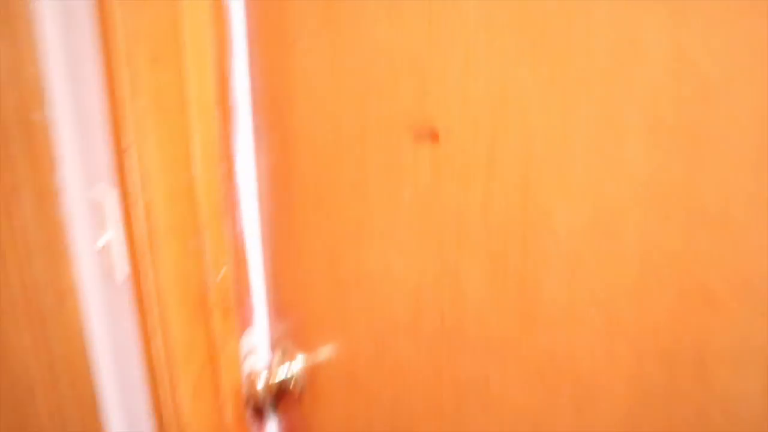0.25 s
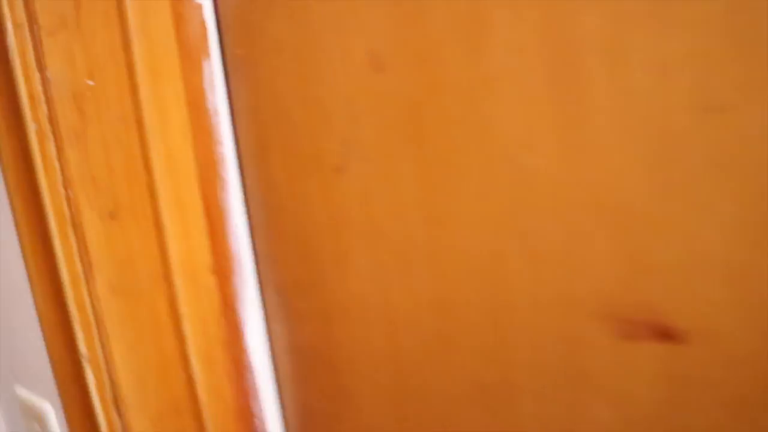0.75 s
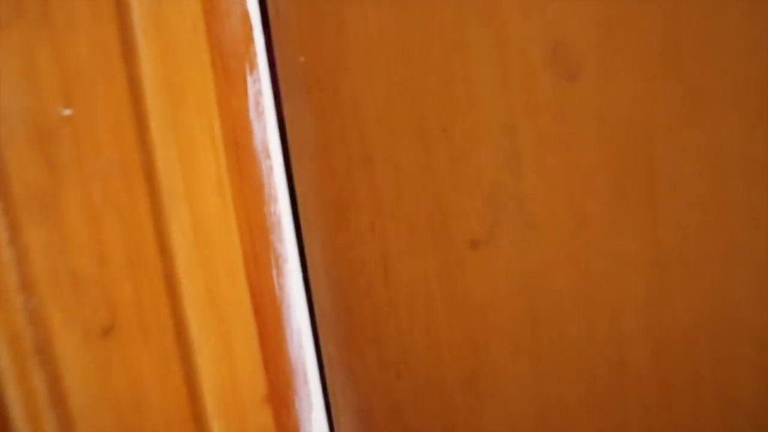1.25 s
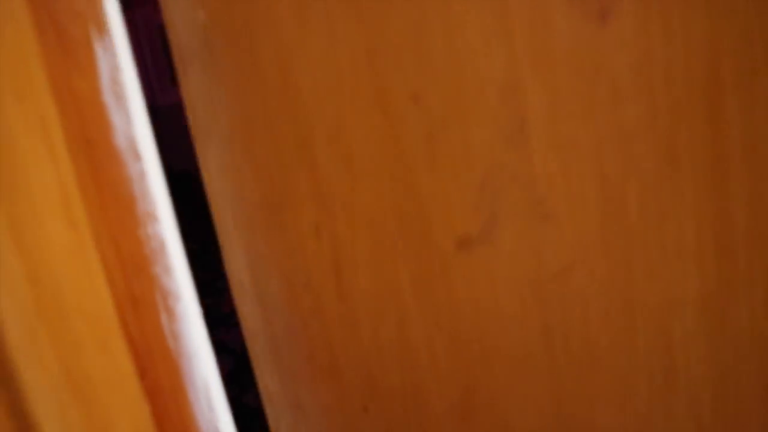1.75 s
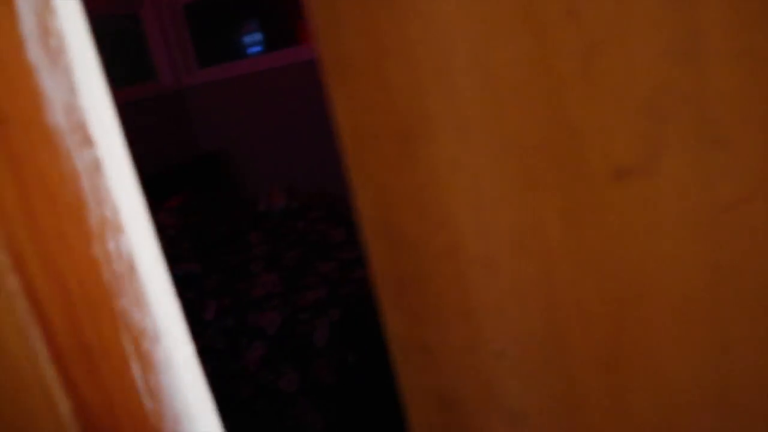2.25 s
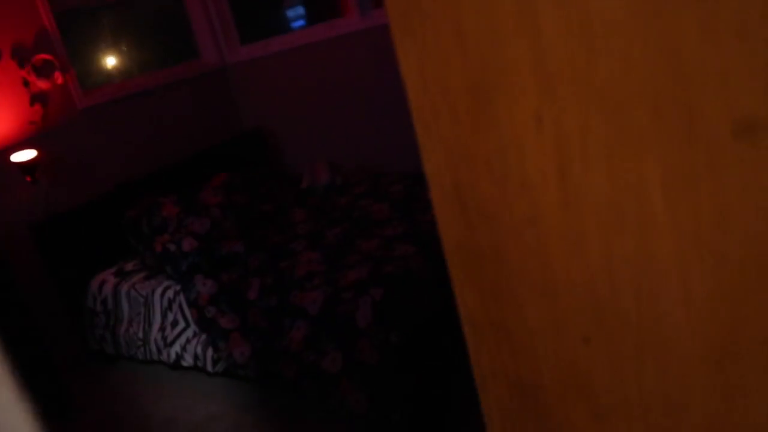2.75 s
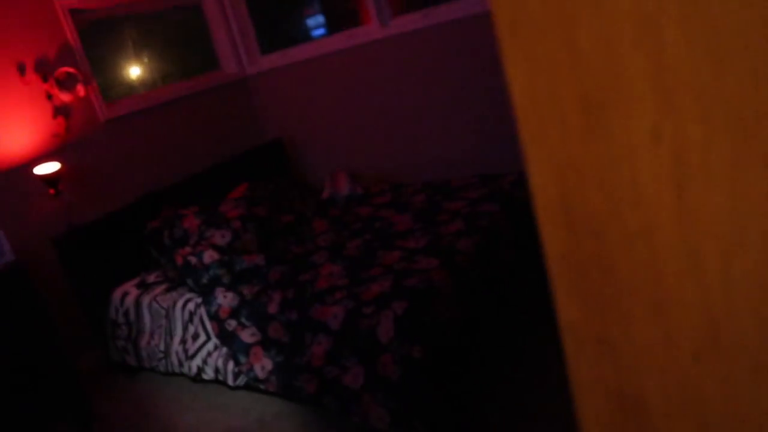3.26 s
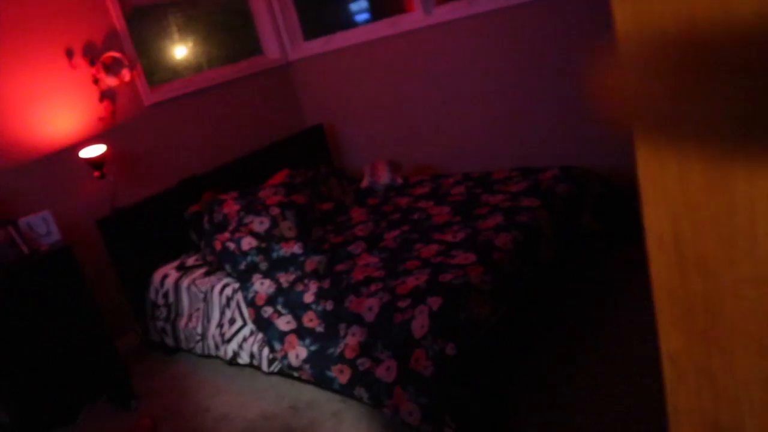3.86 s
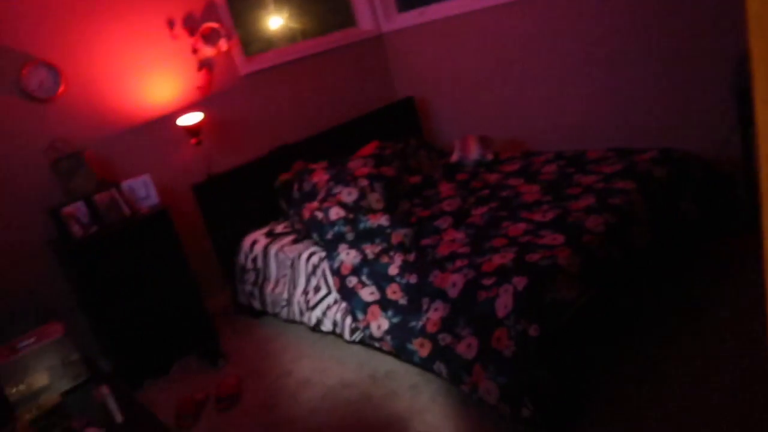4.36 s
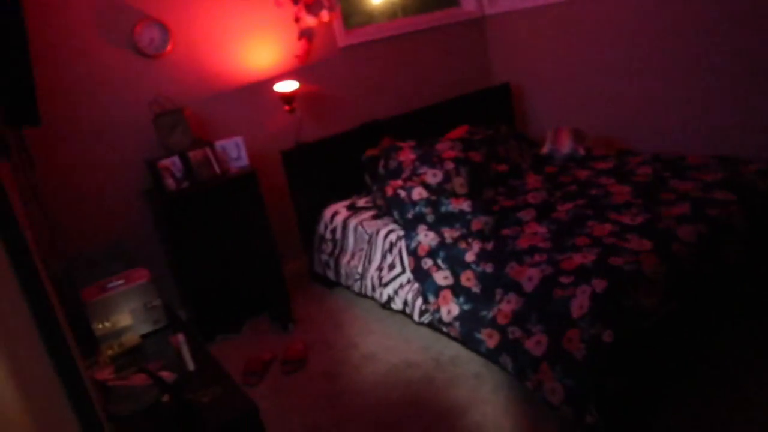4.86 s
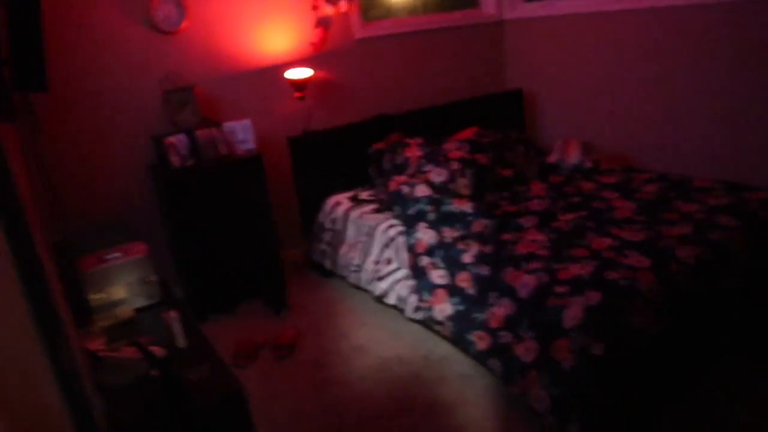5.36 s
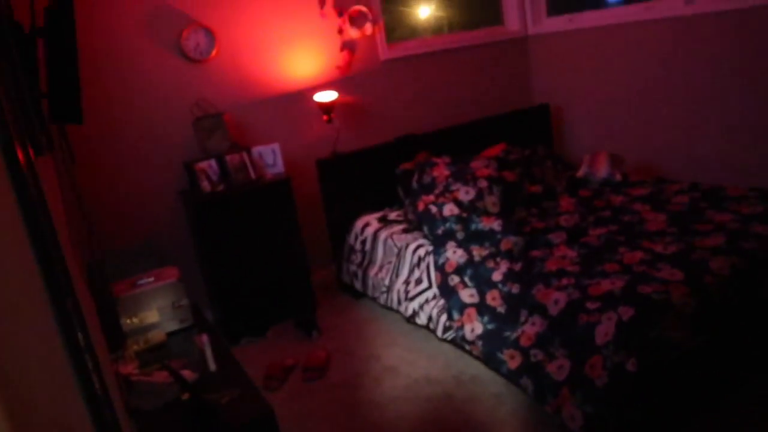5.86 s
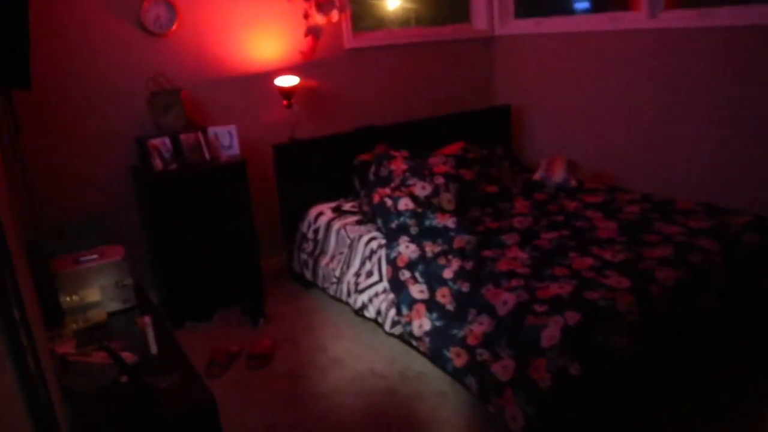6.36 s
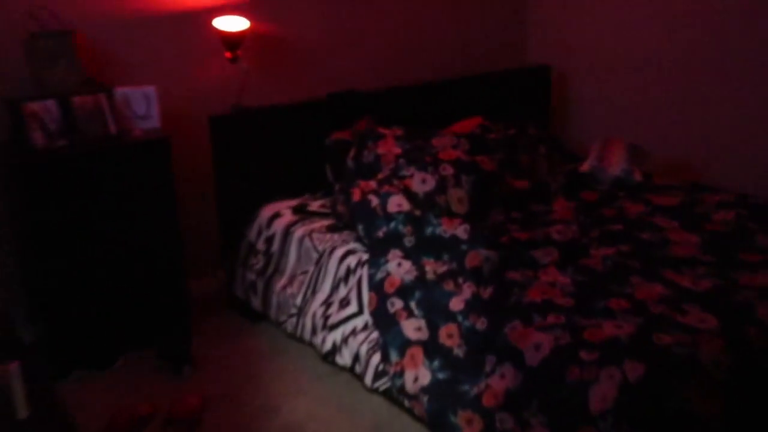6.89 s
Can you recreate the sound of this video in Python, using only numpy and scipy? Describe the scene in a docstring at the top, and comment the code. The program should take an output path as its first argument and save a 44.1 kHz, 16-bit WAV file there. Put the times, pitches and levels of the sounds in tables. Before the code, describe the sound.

A door latch pops open loudly in a quiet humming room, followed by close plastic creaks, clicks and handling rustle.

```python
"""Bedroom door, hand-held camera

A wooden door pops free of its latch, rings into the corridor and swings open on a quiet bedroom
with a low hum. Right at the left microphone, the camera's plastic case creaks, ticks and is rubbed
by fingers. The camera widens its stereo picture, so treble arrives largely in opposite phase."""
import sys
import numpy as np
from scipy import signal
from scipy.fft import rfft, irfft
from scipy.io import wavfile
from scipy.ndimage import uniform_filter1d

SR = 44100
rng = np.random.default_rng(int(sys.argv[2]) if len(sys.argv) > 2 else 0)


def unload_audio(sound):
    """Save the sound as a 16-bit wav file, at the path given as the first command line argument."""
    columns = np.transpose(np.atleast_2d(sound))
    # keep every value between -1 and 1, then stretch to whole-number steps
    steps = np.round(np.clip(columns, -1, 1) * 32767)
    wavfile.write(sys.argv[1], SR, steps.astype(np.int16))


N = 314344


def amp(db):
    return 10 ** (np.asarray(db) / 20)


def unit_rms(x):
    return x / np.sqrt(np.mean(x ** 2) + 1e-20)


def curve_at(points, hz):
    """Read a curve along a logarithmic frequency axis."""
    f, value = np.transpose(points)
    return np.interp(np.log(hz + 1), np.log(f + 1), value)


def add(mix, start_s, sound):
    part = mix[:, round(start_s * SR):][:, :sound.shape[-1]]
    part += sound[..., :part.shape[1]]


def ring(hz, t60, rise_s, count):
    """A sine that swells in and dies by 60 dB in t60 seconds."""
    t = np.arange(count) / SR
    return np.sin(2 * np.pi * hz * t) * amp(-60 * t / t60) * (1 - np.exp(-t / rise_s))


def drift(rate_hz):
    """A slow random wander, rms about 1."""
    steps = rng.standard_normal(N // 256 + 2)
    smooth = signal.filtfilt(*signal.butter(2, rate_hz, fs=SR / 256), steps)
    return np.interp(np.arange(N) / 256, np.arange(len(steps)), np.clip(unit_rms(smooth), -2, 2))


def noise_spectra(size):
    """Two sets of random short-time spectra, with their frequencies and times."""
    frames = 4 * N // size + 5
    z = rng.standard_normal((frames, size // 2 + 1, 4)).T
    return z[:2] + 1j * z[2:], np.fft.rfftfreq(size, 1 / SR)[:, None], np.arange(frames) * size / 4 / SR


def to_sound(spectra):
    size = 2 * (spectra.shape[-2] - 1)
    return signal.istft(spectra, nperseg=size, noverlap=3 * size // 4)[1][..., :N]


def left_right(centre, side):
    return np.array([centre + side, centre - side])


def room_tone():
    """Rumble and wavering hum in the centre, hiss mostly at the sides."""
    # Air at centre and sides. Each row: frequency in Hz, relative level in dB.
    centre_air = [(15, -25), (25, -37), (54, -2), (173, -7.5), (192, -3), (293, -6), (326, -9), (353, -4),
                  (599, -15), (666, -19), (722, -19), (1730, -29), (2140, -29.5), (11000, -49),
                  (14000, -92)]
    side_air = [(21, -55), (35, -28), (167, -3), (245, -0.5), (301, -1.5), (399, 0.5), (557, -2), (840, -4),
                (1030, -3), (1370, -7), (2280, -8.5), (5740, -17), (14100, -31), (16000, -34)]
    # The low end is stronger in the corridor than in the bedroom. Each row: time in seconds, gain in dB.
    rumble = [(0, -2), (1.4, -1), (2.2, 0), (3, -2.5), (7.13, -4)]
    # Hum lines. Each row: frequency in Hz, base level in dB, waver in dB.
    hum = [(49.7, -51, 6.5), (58.3, -50, 0.5), (204.4, -52, 1), (235.7, -54, -5.5), (302.2, -52, 3.5),
           (353, -56.5, 2.5), (404, -63.5, -7.5)]
    noise, hz, frame_s = noise_spectra(size=4096)
    rumble_db = np.interp(frame_s, *np.transpose(rumble)) / (1 + (hz / 350) ** 2)
    centre = unit_rms(to_sound(noise[0] * amp(curve_at(centre_air, hz) + rumble_db)))
    centre *= amp(-44 + .5 * drift(0.38))
    side = amp(-52.5) * unit_rms(to_sound(noise[1] * amp(curve_at(side_air, hz))))
    t = np.arange(N) / SR
    for f, db, waver_db in hum:
        level_db = db + waver_db * drift(2.26) + np.interp(t, *np.transpose(rumble))
        phase = 2 * np.pi * (f * t + rng.random()) + 0.27 * drift(11.0)
        centre += np.sqrt(2) * amp(level_db) * np.sin(phase)
    return left_right(centre, side)


def finger_rub():
    """Patchy friction hiss of skin on the case, brighter when quick, leaning to the left."""
    # Steady rustle of the holding hand. Each row: time in seconds, relative level in dB.
    grip = [(0, -76), (.25, -74.5), (.52, -71), (.78, -77), (1.1, -73.5), (1.35, -82.5), (1.55, -74),
            (2, -86), (2.3, -78.5), (2.5, -88), (3.4, -88.5), (3.9, -82.5), (4.15, -74), (5.56, -74.5),
            (5.64, -94), (6.25, -90), (6.4, -74), (6.5, -78), (7.13, -88)]
    # Sliding fingers. Each row: middle and length in seconds, pressure in dB, speed 0-1, squeal in Hz.
    strokes = [(0.719, 0.05, -70.5, 0.13, 1470), (4.406, 0.034, -59.5, 0.7, 4530),
               (4.55, 0.31, -68, 0.59, 2200), (4.716, 0.056, -72, 0.73, 2130),
               (4.884, 0.069, -72.5, 0.5, 2580), (5.024, 0.16, -59.5, 0.9, 2280),
               (5.524, 0.14, -74, 0.27, 1490), (5.373, 0.12, -68.5, 0.4, 2130),
               (6.099, 0.097, -68, 0.4, 1430), (6.212, 0.076, -73, 0.45, 1140)]
    # Friction colours, blended by speed. Each row: frequency in Hz, relative level in dB.
    slow_rub = [(500, 4.5), (1000, 7.5), (1700, 2.5), (2200, -0.5), (3800, 2), (6100, -1), (7200, -2),
                (9800, -4.5), (12300, 2), (14500, -24), (15800, -58)]
    fast_rub = [(500, -33.5), (1000, -55.5), (1800, -14), (2500, -5), (4200, -7.5), (5800, 5), (7000, -0.5),
                (9800, 10), (12500, -48), (13800, -18), (15500, -67)]
    # Width of the rub. Each row: frequency in Hz, centre minus side in dB.
    centre_over_side = [(500, 9), (2000, 1), (5000, -4), (9000, -4), (11500, -10), (14000, -60)]
    grip_speed, grip_squeal_hz, left_lean = 0.19, 2270, 0.24
    noise, hz, t = noise_spectra(size=256)
    middle, length, pressure_db, peak_speed, stroke_hz = np.transpose(strokes)[..., None]
    off_middle = (2 * (t - middle) / length) ** 2  # pressure and speed ease off toward both ends
    stroke_db = pressure_db - 9 * off_middle ** 0.87
    power = amp(2 * np.vstack([np.interp(t, *np.transpose(grip)), stroke_db]))
    speeds = np.vstack([np.full_like(t, grip_speed), peak_speed / (1 + 0.43 * off_middle)])
    speed = np.clip((power * speeds).sum(0) / power.sum(0), 0, 1)
    squeal_hz = np.append(grip_squeal_hz, stroke_hz)[power.argmax(0)]  # the loudest touch sets the pitch
    squeal_db = 11 * np.exp(-(np.log((hz + 1) / squeal_hz) / .09) ** 2)
    colour = amp((2.5 - speed) * curve_at(slow_rub, hz) + speed * curve_at(fast_rub, hz) + squeal_db)
    colour /= np.sqrt((colour ** 2).mean(0))
    patches = uniform_filter1d(rng.standard_normal(colour.T.shape), 12, axis=0)
    patches = unit_rms(uniform_filter1d(patches, 6, axis=1)).T
    flicker = unit_rms(uniform_filter1d(rng.standard_normal(len(t)), 3))
    colour *= np.sqrt(power.sum(0)) * amp(2.6 * patches + 1.8 * flicker)
    centre = left_lean * noise[0] + np.sqrt(1 - left_lean ** 2) * noise[1]
    centre *= amp(curve_at(centre_over_side, hz))
    return left_right(*to_sound(np.array([centre, noise[0]]) * colour))


def skin_scuffs():
    """Skin scuffs over the case: dense tiny grains under a soft swell, louder on the left."""
    # Each row: middle and length in seconds, left level in dB, band centre in Hz.
    scuffs = [(0.409, 0.013, -41, 1460), (0.432, .015, -54, 2600), (0.463, .014, -48, 2600),
              (0.52, 0.0065, -38.5, 2320), (0.546, .008, -48, 2000), (0.6, .012, -52, 2500),
              (0.715, 0.029, -45, 1500), (0.827, .012, -45.5, 2780), (1.501, 0.078, -63, 900),
              (2.8, 0.022, -55, 1500), (5.386, 0.087, -51, 1210), (5.384, 0.071, -46.5, 2800),
              (6.084, 0.025, -51, 1990), (6.222, 0.044, -43.5, 1300), (5.47, 0.01, -53, 2200),
              (4.72, .02, -49, 3500)]
    octaves, grains_per_s, spread_db = 1.34, 2500, 4.5
    out, t = np.zeros((2, N)), np.arange(-4096, 4096) / SR
    for middle, length, db, hz in scuffs:
        noise = rng.standard_normal((4, len(t)))
        catches = rng.random((2, len(t))) < grains_per_s / SR
        grains = noise[:2] * catches * amp(spread_db * noise[2:])
        band = signal.butter(2, hz * 2 ** (octaves * np.array([-.5, .5])), "bandpass", fs=SR)
        left, other = unit_rms(signal.lfilter(*band, grains))
        swell = np.exp(-(2 * t / length) ** 4)
        add(out, middle + t[0], amp(db) * swell * np.array([left, 0.19 * left + 0.46 * other]))
    return out


def dull_bumps():
    """Low pushes through hand and door, alike at both microphones."""
    # Each row: start in seconds, level in dB, pitch in Hz.
    bumps = [(1.467, -17.5, 168), (1.485, -25, 131), (1.496, -28, 150), (1.519, -21, 139),
             (1.535, -22, 175), (2.338, -20, 65.4), (5.47, -24, 165), (5.492, -22, 200), (5.5121, -23, 170),
             (5.532, -18, 171), (5.554, -19, 206), (6.07, -14, 123), (6.0801, -12, 133), (6.087, -17, 163)]
    out = np.zeros((2, N))
    for start, db, hz in bumps:
        add(out, start, amp(db) * ring(hz, t60=3.3 / hz, rise_s=0.0013, count=8000))
    return out


def case_ring(body_db, treble_db):
    """The plastic case rings: treble at once, the body swelling a moment later, with a little grit."""
    # Each row: frequency in Hz, relative level in dB, t60 in seconds, signed share at the right.
    modes = [(238, 5.5, 0.0088, 0.72), (652, -6, 0.025, 0.74), (789, 3, 0.018, 0.64), (1001, 3.5, 0.017, 1),
             (1180, -2.5, 0.0066, 1), (1750, -13, 0.018, 0.79), (2200, -39, 0.0097, 0.42),
             (2710, -10.5, 0.017, -0.45), (3920, -1.5, 0.0093, 0.99), (4420, 1, 0.0065, -0.51),
             (5690, -7.5, 0.011, -0.69), (6550, 7, 0.0052, 0.11), (7550, 15, 0.00045, 0.62)]
    tuning = 1 + .013 * rng.standard_normal(len(modes))
    t = np.arange(2000) / SR
    grit_band = signal.butter(2, [900, 2200], "bandpass", fs=SR)
    grit = signal.lfilter(*grit_band, rng.standard_normal((2, len(t))))
    out = amp(treble_db - 2.5 - 60 * t / 0.087) * grit
    out[:, :58] -= amp(body_db + 6) * np.hanning(58) ** 2  # the wall is pulled in, then springs back
    for tune, (hz, db, t60, right_share) in zip(tuning, modes):
        if hz > 2500:
            gain, rise_s, delay = -amp(db + treble_db - 2.5), .0002, 0
        else:
            gain, rise_s, delay = amp(db + body_db + 5.5), .0003, 52
        mode = gain * np.roll(ring(hz * tune, t60, rise_s, len(t)), delay)
        out += np.array([np.roll(mode, 4), right_share * mode])
    return signal.lfilter(*signal.iirnotch(3270, Q=11, fs=SR), out)  # the case is deaf at this pitch


def seam_creaks():
    """The seam sticks and slips; every slip pulls the case the same way, so the snaps sound alike."""
    # Each row: start in seconds, treble and body strength in dB.
    snaps = [(0.0174, -40, -35), (0.0735, -28, -34.5), (0.0847, -32, -35.5), (0.099, -30, -34.5),
             (0.1095, -29.5, -37.5), (0.147, -27, -32.5), (0.191, -27, -32), (2.319, -39.5, -34.5),
             (3.4973, -27.5, -31), (3.5055, -33, -35), (3.978, -21.5, -28.5), (3.99, -32, -32),
             (4.1415, -19.5, -29), (4.1498, -25, -29), (4.16, -35, -32), (4.1772, -21.5, -29.5),
             (4.1851, -22, -31), (4.1914, -26, -33.5), (4.198, -26, -33), (4.2068, -24, -33),
             (4.2176, -22, -34), (4.2273, -28, -32.5), (4.236, -26, -35)]
    out = np.zeros((2, N))
    for start, treble_db, body_db in snaps:
        add(out, start, case_ring(body_db, treble_db))
    return out


def fingertip_ticks():
    """A fingertip hits plastic: a click of a few cycles, a bright spit, a short scratch and a knock."""
    # Each row: peak time in seconds, click level in dB, pitch in Hz, width in cycles,
    # then scratch strength, knock strength and lean to the left, all in dB.
    ticks = [(3.53, -31, 3040, 2, -42, -62, 5), (3.571, -41, 2390, 2.4, -39, -58, 2.5),
             (3.63, -31.5, 3200, 2, -42, -60, 5), (3.728, -34.5, 2630, 1.7, -39, -67, 8),
             (4.371, -16, 2560, 0.75, -12, -35.5, 13), (4.3937, -12.5, 4570, 2.54, -24.5, -48, 3),
             (4.3936, -16.5, 2640, 2, -38, -43, 10), (4.509, -25, 2540, 2.3, -45, -47, 4),
             (4.723, -30.5, 2370, 4.1, -37, -67, 14), (4.8447, -16, 2870, 1.7, -35, -53, 18),
             (4.851, -23, 1390, 1.6, -30, -43, 2), (4.8542, -36, 1500, 1.3, -36, -37.5, -5),
             (4.8566, -38, 1500, 1.6, -38, -41, -5), (5.179, -36, 1200, 1.5, -36, -43, 0),
             (5.2035, -2.5, 1880, 0.71, -14, -46, 17), (5.2052, -28, 2000, 2.6, -33, -46, 8),
             (5.31, -33, 1025, 2.06, -30, -52, -1), (5.3167, -27.5, 1740, 3, -34, -43, 1),
             (5.338, -37, 1670, 1.4, -37, -60, 3), (5.362, -32, 1040, 2.6, -43, -55, 10),
             (5.464, -41, 1650, 2.7, -34.5, -48, 6), (5.4918, -29, 2160, 1.2, -32.5, -50, 3),
             (5.511, -33, 1710, 1.55, -30, -49, 2.5), (5.5328, -37, 1760, 1.7, -32, -51, -2),
             (5.554, -42, 1730, 1.5, -39.5, -51, -4), (5.565, -36, 1800, 0.76, -34, -57, -8.5),
             (6.288, -35, 1720, 5.7, -44, -55, 9.5), (6.2983, -27, 2040, 1.6, -34.5, -43.5, 8),
             (6.321, -30, 2270, 1.6, -38, -45, 9.5), (6.3548, -23, 2200, 0.73, -44, -54, 9),
             (6.416, -27, 2190, 2.4, -31.5, -46, 3), (6.468, -31, 2220, 1.5, -37.5, -45, 1),
             (6.63, -44, 2150, 1.9, -39, -65, 2), (6.991, -27, 2340, 1.5, -45, -44.5, 7),
             (7.032, -32.5, 2490, 2.3, -44, -52, 1.5), (7.1245, -34, 2300, 4, -48, -57, 9)]
    fall_over_rise, pitch_sag, swing_back = 2.1, .06, 0.11
    out, t = np.zeros((2, N)), np.arange(2000) / SR
    scratch_band = signal.butter(3, [700, 3600], "bandpass", fs=SR)
    spit_band = signal.butter(3, [5000, 11200], "bandpass", fs=SR)
    for peak_s, db, hz, cycles, scratch_db, knock_db, pan_db in ticks:
        noise = rng.standard_normal((3, len(t)))
        start, turns = peak_s - cycles / hz, hz * t - cycles
        swell = np.exp(-(2 * turns / cycles / np.where(turns > 0, fall_over_rise, 1)) ** 2)
        click = -amp(db) * swell * np.cos(2 * np.pi * turns * (1 - pitch_sag * turns / cycles))
        scratch_s = 0.0031 * cycles  # sharper ticks scratch more briefly
        spit = signal.lfilter(*spit_band, amp(scratch_db + 3.5 - 60 * t / (2.9 * scratch_s)) * noise[0])
        stroke = amp(scratch_db - 5.6 * (t / scratch_s) ** 2) * np.minimum(t / 0.00035, 1)
        scratch = stroke * signal.lfilter(*scratch_band, noise[1:])
        # Touches near the left port turn the right channel over; a share arrives there late, inverted.
        polarity = np.clip(2 - pan_db / 0.81, -.5, 1)
        late_click = swing_back * (1 - polarity) * np.roll(click, 12)
        right = amp(-pan_db) * (polarity * click + scratch[1]) - .6 * spit - late_click
        add(out, start, np.array([click + spit + scratch[0], right]))
        add(out, start, case_ring(knock_db, knock_db - 27))
    return out


def corridor_echo(sound):
    """Sparse reflections of random sign, each band dying at its own speed."""
    # Each row: frequency in Hz, t60 in seconds.
    decay = [(100, 0.7), (260, 0.16), (700, 0.3), (1840, 0.26), (4850, 0.23)]
    taps = np.zeros((2, SR // 2))
    arrivals = np.arange(300, SR // 2 - 20, 20) + rng.integers(0, 20, (2, (SR // 2 - 301) // 20))
    np.put_along_axis(taps, arrivals, rng.choice([-1., 1.], arrivals.shape), 1)
    hz, t, spectra = signal.stft(taps, SR, nperseg=256)
    tail = signal.istft(spectra * amp(-60 * t / curve_at(decay, hz)[:, None]), SR, nperseg=256)[1]
    centre, side = signal.fftconvolve(sound[None], tail / np.linalg.norm(tail[0]), axes=1)[:, :N]
    return left_right(centre, amp(-32) * side)


def door():
    """Each blow clacks and rings the wooden leaf; the spot struck sets the modes' strengths and signs."""
    # The latch lets go, then the swinging door knocks faintly.
    # Each row: start in seconds, strength in dB, spot on the leaf 0-1.
    blows = [(1.621, -7, 0.15), (1.624, -5, 0.29), (1.6275, -5.5, 0.2), (1.6309, -4.5, .41),
             (2.797, -32.5, 0.2), (2.808, -49, .35)]
    # Modes of the leaf. Each row: frequency in Hz, relative level in dB, t60 in seconds.
    modes = [(100.5, -12, 0.23), (172.5, -17, 0.31), (285, -12.5, 0.12), (380, -5.5, 0.053),
             (460, -12, 0.049), (520, -12, 0.068), (653, -13, 0.068), (822, -5, 0.037), (854, -15, .08),
             (882, -10, 0.17), (926, -14, 0.2), (942, -11, 0.18), (1024, -7, 0.093), (1102, -4, 0.046),
             (1204, -3, 0.073), (1330, -4, 0.04), (1320, -12, 0.037), (1561, -18, 0.06), (1716, -7.5, 0.06),
             (1980, -15, 0.038), (2210, -16, .05), (2660, -14, .035), (2830, -22, 0.045),
             (3066, -21, 0.031)]
    # Broad clack of the bolt. Each row: frequency in Hz, relative level in dB.
    bolt_spectrum = [(180, -38), (300, 2.5), (715, -9), (860, 1.5), (1340, 3), (1540, -9), (1700, -5),
                     (3000, -12.5), (3370, -24), (9000, -41), (11700, -98), (19800, -120)]
    out, t = np.zeros((1, N)), np.arange(16384) / SR
    colour = amp(curve_at(bolt_spectrum, np.fft.rfftfreq(len(t), 1 / SR)))
    rattle_band = signal.butter(3, 110, fs=SR)
    for start, db, spot in blows:
        shares = np.sqrt(2) * np.cos(2 * np.pi * spot * np.arange(len(modes)))
        bends = 1 + .004 * rng.standard_normal(len(modes))  # each blow detunes the modes a little
        wood = sum(share * amp(mode_db) * ring(hz * bend, t60, 0.19 / hz, len(t))
                   for share, bend, (hz, mode_db, t60) in zip(shares, bends, modes))
        rattle = unit_rms(signal.lfilter(*rattle_band, rng.standard_normal(len(t))))
        wood *= 1 + .5 * rattle  # the loose leaf rattles as it rings
        clack = unit_rms(irfft(rfft(rng.standard_normal(len(t))) * colour))
        clack *= amp(4.5 - 60 * t / 0.019) * np.minimum(t / 0.0012, 1)
        add(out, start, amp(db - 10.5) * (wood + clack))
    direct = out[0]
    left = np.roll(direct, 3)  # the left microphone is a little further away
    return np.array([left, direct]) + amp(-8.5) * corridor_echo(direct)


def scene():
    return (room_tone() + finger_rub() + door() + seam_creaks() + fingertip_ticks()
            + skin_scuffs() + dull_bumps())


def record(dry):
    """The camera's band limit cuts the top treble."""
    lowpass = signal.firwin(511, 16200, window=("kaiser", 9), fs=SR)
    return signal.oaconvolve(dry, lowpass[None], "same")


dry = scene()
out = record(dry)
unload_audio(out)
```